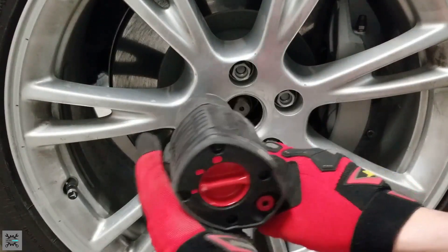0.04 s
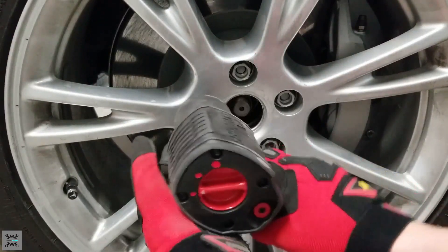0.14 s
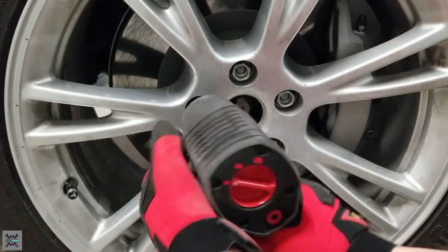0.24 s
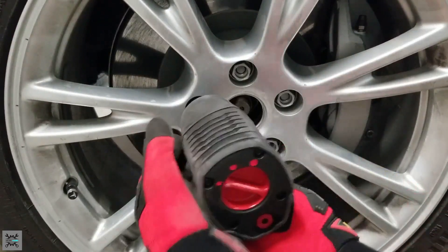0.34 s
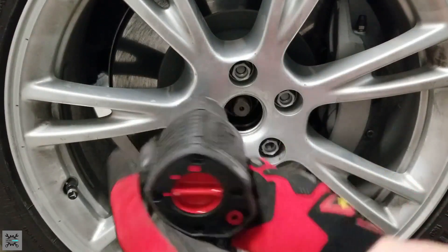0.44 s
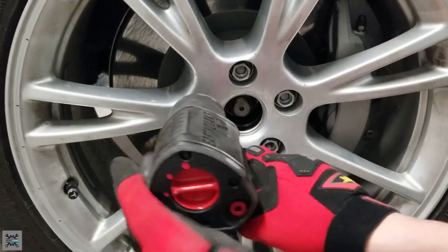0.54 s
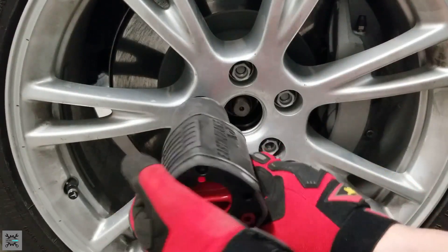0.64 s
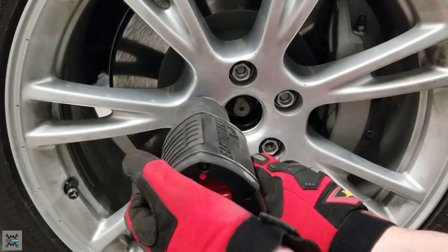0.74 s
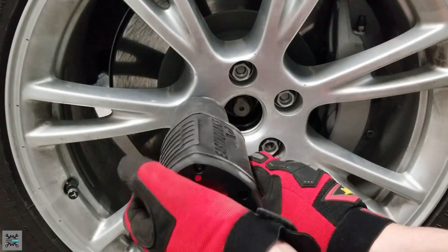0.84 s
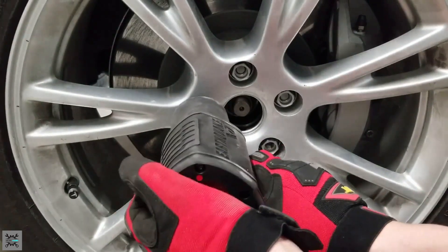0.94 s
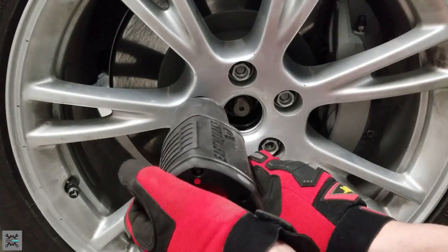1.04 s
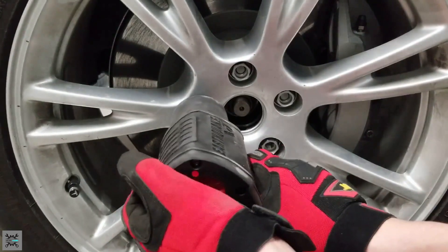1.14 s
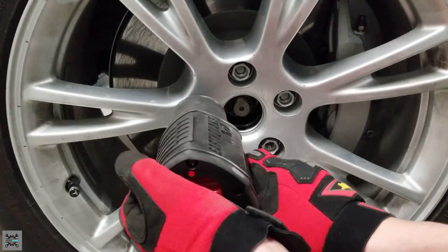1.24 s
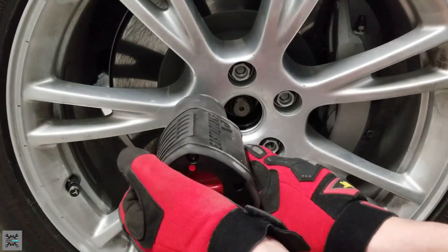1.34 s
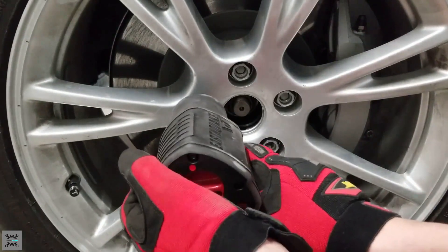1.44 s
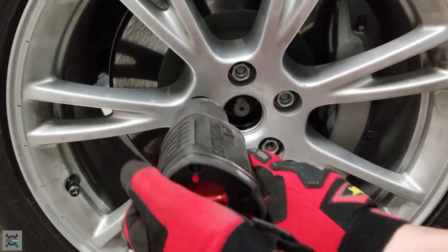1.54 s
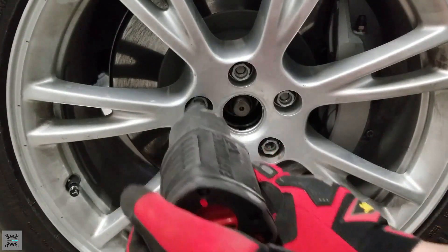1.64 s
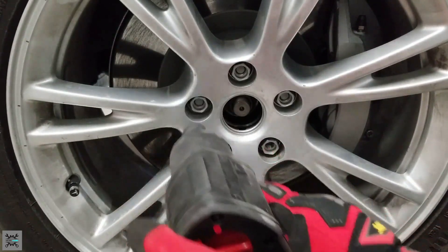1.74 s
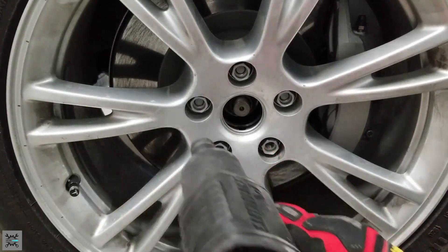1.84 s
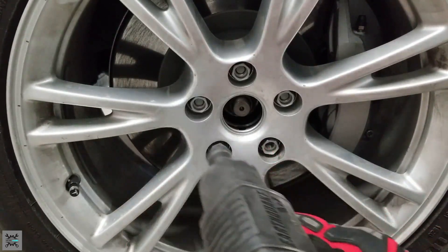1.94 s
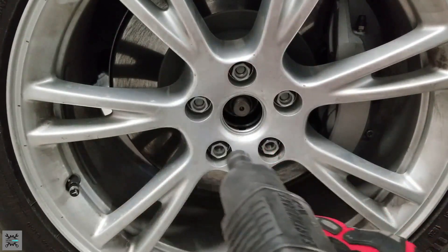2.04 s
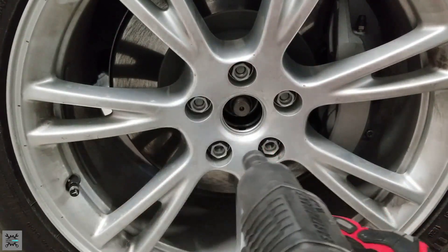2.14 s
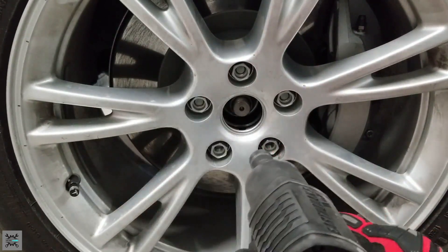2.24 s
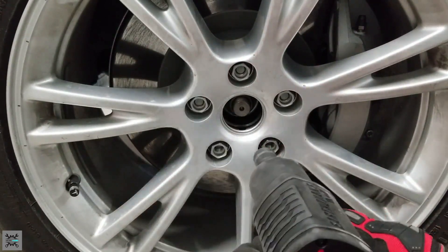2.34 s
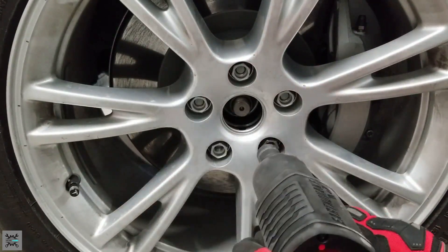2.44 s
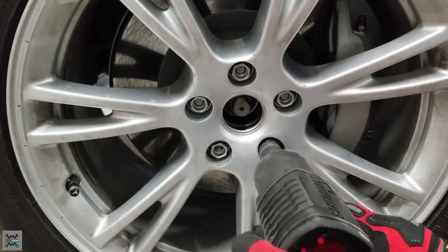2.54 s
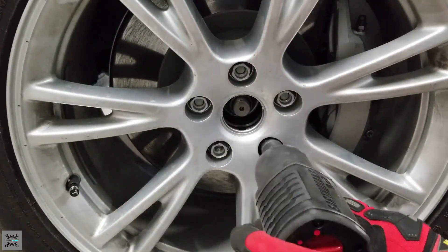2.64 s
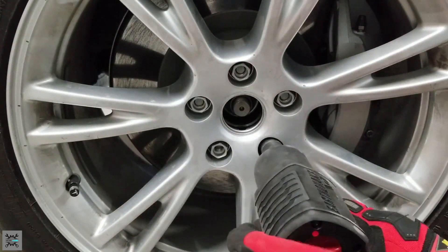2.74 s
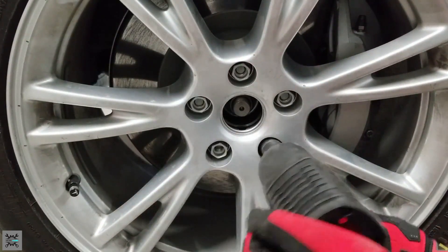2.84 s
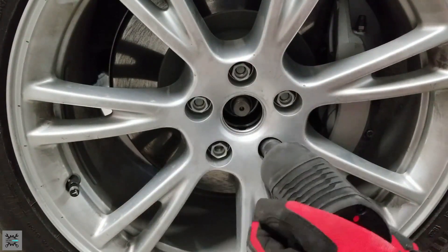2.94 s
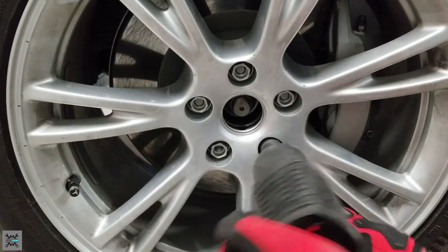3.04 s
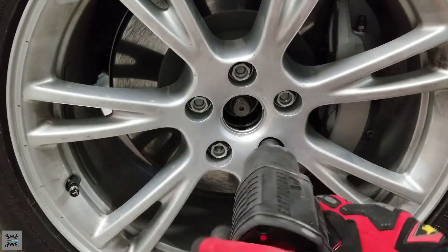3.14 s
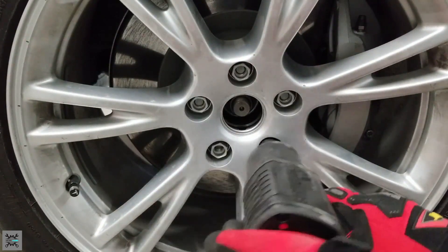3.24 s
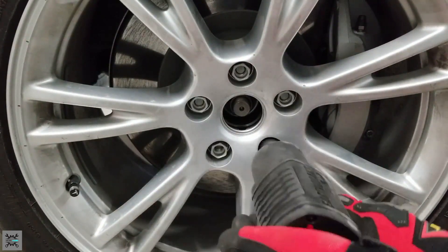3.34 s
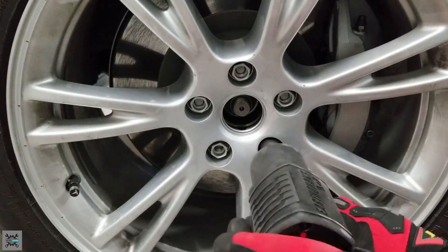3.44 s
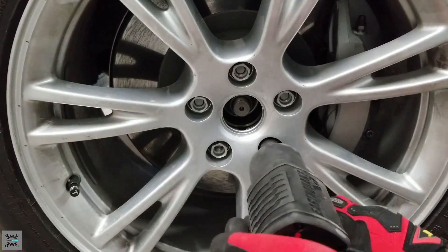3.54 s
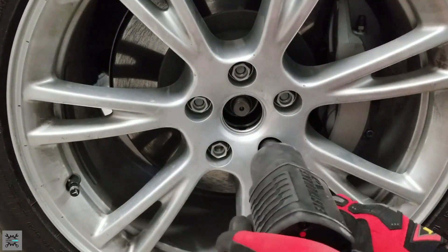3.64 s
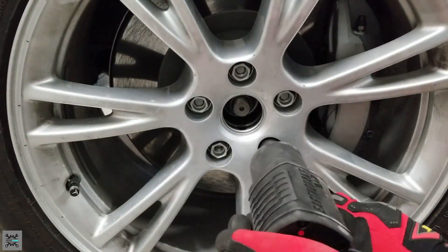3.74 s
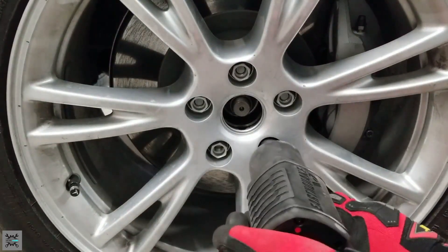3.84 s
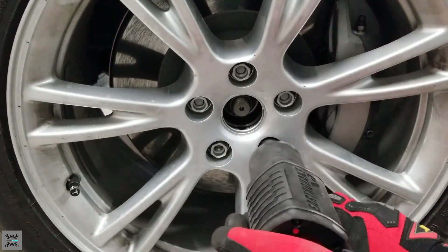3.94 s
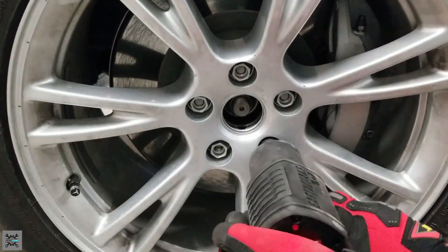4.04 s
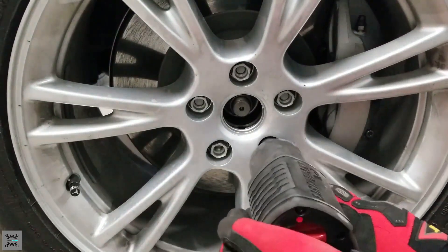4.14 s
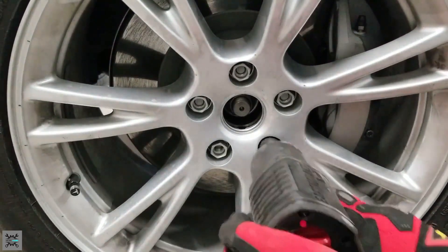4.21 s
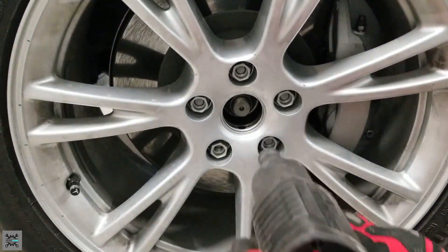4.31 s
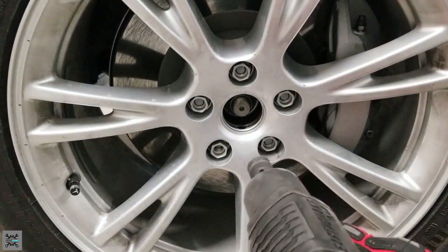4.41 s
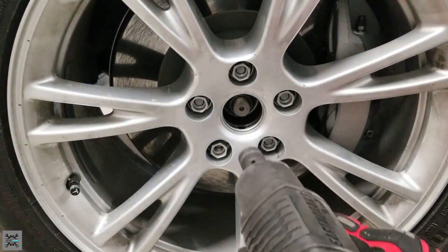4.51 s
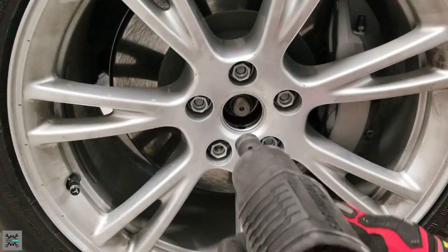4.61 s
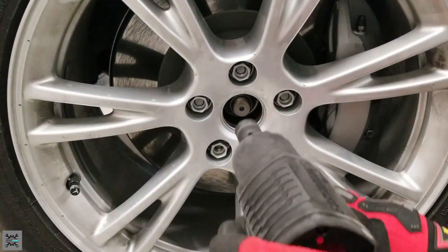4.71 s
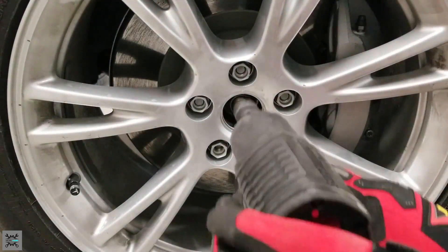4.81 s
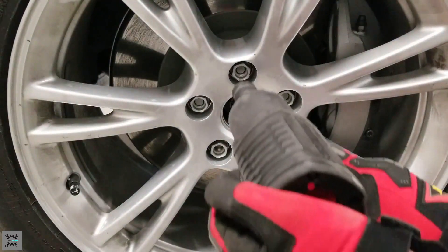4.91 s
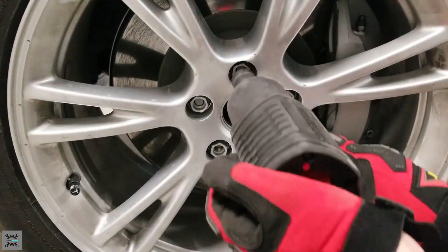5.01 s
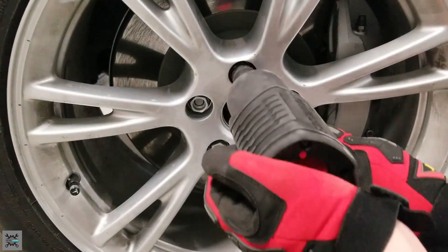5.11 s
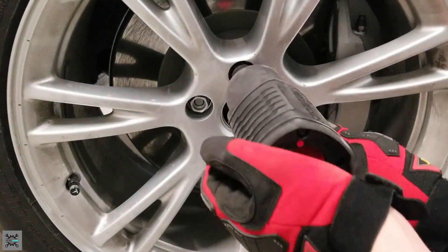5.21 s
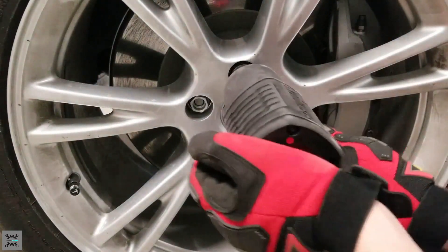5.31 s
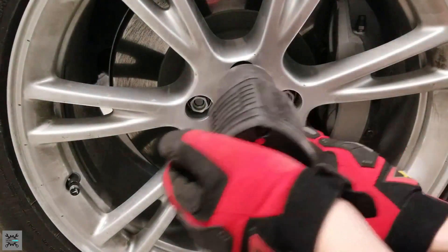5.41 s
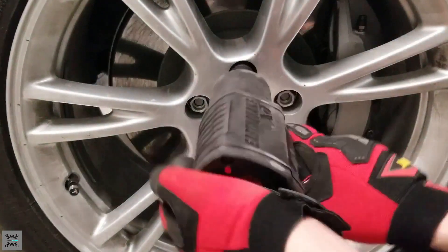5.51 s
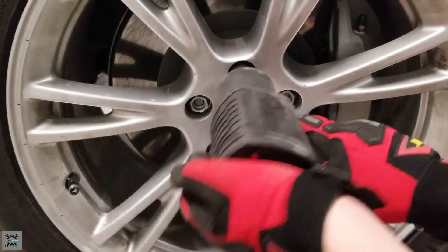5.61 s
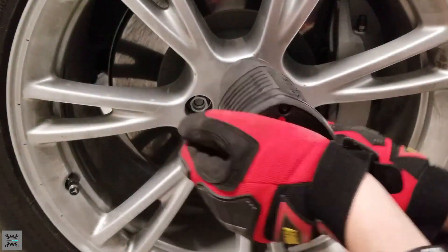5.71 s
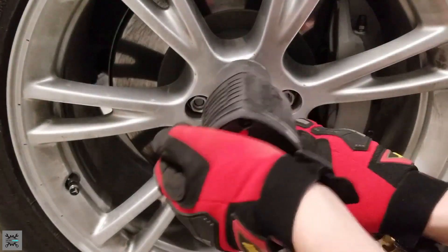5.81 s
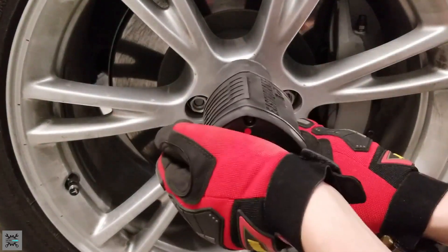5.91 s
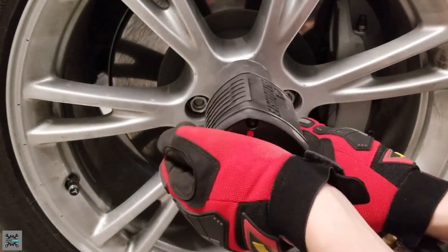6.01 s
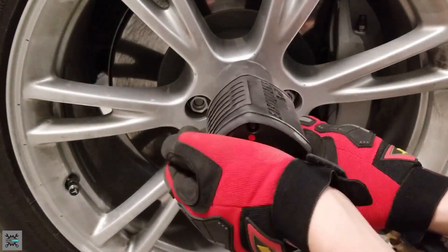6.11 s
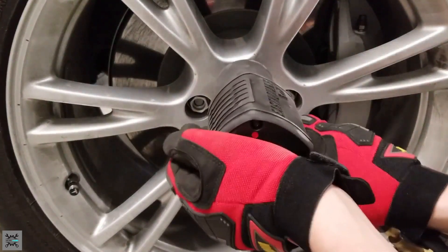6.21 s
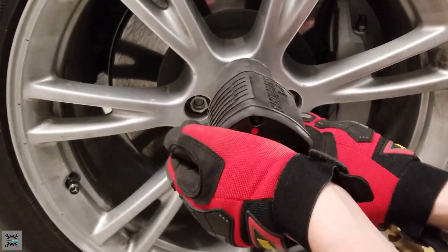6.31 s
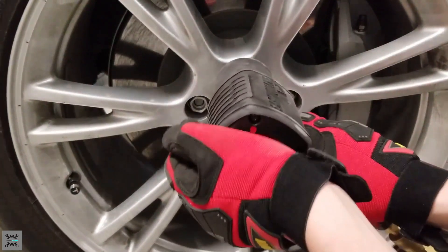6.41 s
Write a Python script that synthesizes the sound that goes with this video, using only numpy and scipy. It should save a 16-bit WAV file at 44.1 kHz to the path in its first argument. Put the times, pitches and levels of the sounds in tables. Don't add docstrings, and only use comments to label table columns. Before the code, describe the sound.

In a garage, a socket scrapes and clacks onto a wheel nut, then a cordless impact wrench whirrs up and hammers for half a second, rattling hard and ringing the alloy wheel. Quiet follows, with faint hum, small steel ticks and soft knocks, before a second similar burst. More light scraping leads to a third, which is still hammering near the end. Close stereo microphone, slightly stronger on the left, little reverberation.

```python
import sys
import numpy as np
from scipy import signal
from scipy.fft import rfft, irfft, next_fast_len
from scipy.io import wavfile
from scipy.ndimage import uniform_filter1d

SR = 44100
rng = np.random.default_rng(int(sys.argv[2]) if len(sys.argv) > 2 else 0)


def attenuation_scalar(level_db):
    decades = np.asarray(level_db, float) / 20
    return 10 ** decades


def waveform_to_disk(signal):
    frames = np.transpose(np.atleast_2d(signal))
    scaled = np.clip(frames, -1, 1) * 32767
    samples = np.round(scaled).astype(np.int16)
    wavfile.write(sys.argv[1], SR, samples)


N = 284886

# (time [s], peak level [dB], extra ring of the wheel [dB])
FIRST_NUT_BLOWS = [(0.8636, -3.5, -3), (0.8703, -1, -6), (0.886, -2.5, -5.5), (0.8955, -3, 0.5),
                   (0.9187, -2.5, -1), (0.9334, -1, 5.5), (0.9511, -3.5, -1.5), (0.9754, -6, 1.5),
                   (1.002, 0, -1.5), (1.0298, -12, 2.5), (1.056, -7, 4), (1.0669, -3.5, 5.5),
                   (1.095, -3, -7.5), (1.106, -3, -2), (1.1311, -6, 6.5), (1.1494, -17.5, 1.5),
                   (1.1769, 1, -1.5), (1.185, -11, 1), (1.2281, 2, 0), (1.2504, -9, -1), (1.2718, -0.5, -3),
                   (1.2842, -11.5, 3.5), (1.3105, 2, -3), (1.322, -13, -7), (1.3553, -2, -2)]
SECOND_NUT_BLOWS = [(3.5139, -14, 1), (3.524, -17, -1.5), (3.5359, 1, -10.5), (3.5517, 3, -6),
                    (3.5629, -8, -2), (3.5854, 1, 1.5), (3.617, 1.5, 2), (3.6428, 2, 2),
                    (3.6644, -10, -2.5), (3.689, -6, 3.5), (3.7112, -5, -3.5), (3.7322, -4.5, -2.5),
                    (3.773, -4, -1), (3.7891, -12, -1), (3.8056, -1.5, 1.5), (3.8404, -2, -1),
                    (3.8528, -8, -3), (3.878, 2, -1.5), (3.8971, -10.5, 4.5), (3.924, 0, -0.5),
                    (3.937, -17, -2), (3.9592, -8, -2), (3.9702, -3.5, -3.5), (3.9991, -4.5, 2),
                    (4.0387, 0.5, -3), (4.084, -5, 0), (4.1643, -6, -7.5)]
THIRD_NUT_BLOWS = [(6.021, -33.5, 10), (6.0284, -30, -3), (6.0417, -5.5, 0), (6.0583, -2.5, 2.5),
                   (6.0689, -2, -0.5), (6.0907, 0.5, 1), (6.1126, -1, 8), (6.1352, -3, -1),
                   (6.1557, -4, 6.5), (6.1768, -8, 9), (6.2029, -11.5, 3.5), (6.221, -10.5, 8),
                   (6.2417, -7, 1), (6.2603, -10, 0), (6.2722, -5.5, 1), (6.2954, -9, 2.5),
                   (6.318, -9.5, -4), (6.3345, -7, -3), (6.3717, -17.5, 3), (6.3988, -1, 1),
                   (6.4243, -18.5, 0.5), (6.4487, -5, -1)]
# (time [s], peak level [dB], weight [dB], hardness [dB])
KNOCKS = [(.016, -31, -19, -15), (0.284, -49.5, 4, -25), (.305, -41.5, 2.5, -45), (.529, -21.5, 3.5, -2),
          (0.77, -56, -5.5, -1.5), (1.577, -30, -25, 3), (1.704, -43.5, -15, 0), (2.464, -34, -24, -23.5),
          (2.508, -43, -13, -35), (2.599, -50.5, -11, -30), (2.648, -32, -8, -2.5), (2.653, -34, -12, -6),
          (2.775, -46, -5, -8), (2.811, -49, -10, -25.5), (2.882, -37, -4, -30), (3.004, -42, -9, -35),
          (3.085, -32.5, -21, 1.5), (3.141, -29, -9, -4), (3.154, -30, -14, -5), (3.27, -30.5, -1, -6),
          (3.277, -41, -2.5, -18), (5.207, -43.5, -5, 2), (5.442, -44, 11.5, -18.5),
          (5.498, -48, -7, -12.5), (5.51, -46, -9, -3), (5.52, -44, -9, -16), (5.54, -45, -9, -10),
          (5.585, -40.5, -4, 2), (5.669, -42.5, 2, -11), (5.764, -37, -1.5, -3), (5.799, -36, -12, -4),
          (5.81, -39, -12, -2), (5.833, -31, -21, -18.5)]
# (time [s], push level [dB], slide level [dB])
HANDLING = [
    [(0, -56, -64), (.132, -60, -82), (.37, -51.5, -80), (.43, -55, -65), (.525, -54, -60), (.57, -40, -57),
     (.686, -44, -55.5), (.734, -50.5, -68.5), (.84, -54, -85)],
    [(2.44, -84, -92), (2.49, -67.5, -76), (2.656, -62.5, -67), (2.732, -63, -74), (2.954, -54, -79),
     (3.128, -53.5, -66), (3.15, -50, -63.5), (3.284, -48, -64), (3.48, -57, -80)],
    [(5.18, -83, -88), (5.206, -73, -81), (5.43, -64, -80), (5.45, -57.5, -70.5), (5.51, -60, -65),
     (5.724, -54, -68.5), (5.77, -40, -60), (5.96, -56, -78), (6.03, -37.5, -79)],
]
# (frequency [Hz], level [dB])
HUM_LINES = [(182, -10), (301, -0.5), (418, -18), (452, -16), (473, -15.5)]
# (frequency [Hz], level [dB per Hz])
AIR_COLOUR = [(24, -57), (40, -29.5), (118, -28.5), (177, -10), (245, -12), (305, -9), (330, -22),
              (520, -29), (900, -43), (1170, -80.5), (1980, -120)]
# (frequency [Hz], level [dB per Hz])
RATTLE_COLOUR = [(24, -56), (45, -58), (110, -33), (382, -11.5), (570, -13.5), (852, -11), (1020, -7),
                 (1180, -13), (1300, -9.5), (2100, -9.5), (3140, -7.5), (4700, -8), (8770, -15),
                 (11300, -11), (16000, -18)]
# (frequency [Hz], level [dB per Hz])
SCRAPE_COLOUR = [(400, -7.5), (1000, 6), (1800, 4), (3000, -3), (7000, -13), (15000, -38)]
# (frequency [Hz], level [dB per Hz])
RUMBLE_COLOUR = [(40, -18), (70, 2.5), (115, 1), (250, -4), (500, -10.5), (900, -42)]
# (frequency [Hz], t60 [s], level at first, second and third nut [dB])
WHEEL_MODES = [(332, .03, 1.5, -4, -4), (471, 1, -29, -29, -28), (676, 0.4, -17, -13.5, -20),
               (931, 0.44, -16, -14, -15.5), (1015, 0.13, -2, 1.5, -6), (1031, 0.063, -9, -10, -17),
               (1077, 0.39, -15.5, -13.5, -18), (1258, 0.073, -9.5, -4.5, -7), (1338.5, 0.1, -8.5, -7, -.5),
               (1423, 0.067, -12.5, -9.5, -5.5), (1671, 0.09, -9, -8, -.5), (1756, 0.11, -12, -12, -1),
               (1958, 0.12, -4.5, -9, -8.5), (2442, 0.18, -11.5, -8, -7.5), (2640, .16, -12.5, -8.5, -10.5),
               (2810, .12, -6.5, -10, -11), (3090, 0.1, -7, -9, -6), (3250, .09, -14, -14.5, -13),
               (3850, 0.081, -11, -15, -14), (4710, 0.12, -14, -14.5, -17), (5270, 0.1, -9.5, -11.5, -12),
               (6500, 0.24, -24, -23.5, -24), (8485, 0.36, -28, -30.5, -28.5),
               (10650, 0.035, -7.5, -8, -10.5)]
# (frequency [Hz], t60 [s])
BLOW_T60 = [(60, 0.19), (300, 0.21), (1500, 0.115), (5000, 0.125), (15000, 0.08)]
# (frequency [Hz], t60 [s])
GARAGE_T60 = [(60, 0.88), (300, 0.72), (1000, 0.76), (2000, 0.77), (5000, 0.57), (9000, 0.29),
              (13000, 0.52)]
# (frequency [Hz], left-right likeness [0 to 1])
LIKENESS = [(60, 0.95), (250, 0.99), (600, 0.74), (1200, .45), (2500, 0.012), (8000, 0.014)]
# (frequency [Hz], left minus right [dB])
LEFT_LEAN = [(60, -1), (150, 2.5), (380, -0.5), (950, 6.5), (2380, 2.5), (5980, 5.5), (15000, 3)]
# (frequency [Hz], level [dB per Hz])
RUSTLE_COLOUR = [(5000, -30), (9000, -10), (14000, 0.5)]
NEXT_NUT_S = [
    2.3,
    5.95,
]
# (time [s], level reached [dB], time per 60 dB of rise [s])
SWELLS = [
    (.525, -50, 0.3),
    (.864, -22, 0.06),
    (3.513, -34, 0.035),
    (6.042, -23, 0.025),
]
# (time [s], level [dB])
TICKS = [
    (0.53, -36),
    (.769, -53.5),
    (1.577, -58),
    (1.705, -64),
    (3.086, -59),
    (3.143, -47.5),
    (5.21, -58),
    (5.441, -63),
    (5.5, -64),
    (5.586, -60),
]
# (time [s], length [s], level [dB])
SQUEAKS = [
    (2.57, 0.111, -68),
    (3.098, 0.072, -69.5),
]
# (squeezed [s], let go [s], motor level [dB], gear rattle level [dB], rattle fade [dB per s])
PULLS = [
    (0.853, 1.33, -31.5, -17, 58),
    (3.523, 4.05, -27.5, -16, 64.5),
    (6.029, 6.5, -26, -16, 41),
]
# (time [s], from speed [Hz], towards speed [Hz], sag under load [Hz per s])
SPINS = [
    (.85, 140.6, 180, 10),
    (0.946, 119.6, 210, 29.1),
    (1.199, 150.4, 195, 10),
    (3.55, 128, 305.4, 225),
    (6.045, 121.6, 292, 173),
]
# (time [s], peak level [dB])
BOUNCES = [(0.9377, -8.5), (.968, -10), (1.0052, -6), (1.0125, -7.5), (1.139, -9), (1.154, -8.5),
           (1.1975, -8), (1.2067, -14), (1.2782, -5), (1.29, -9.5), (1.3164, -5), (1.325, -7), (1.331, -14),
           (1.367, -14), (3.5649, -5), (3.5779, -11), (3.5925, -6), (3.6046, -6.5), (3.6474, -2),
           (3.674, -8.5), (3.7165, -5), (3.7423, -9.5), (3.7522, -5), (3.759, -8.5), (3.78, -8),
           (3.8227, -4.5), (3.8549, -4.5), (3.905, -16.5), (3.9283, -6), (3.974, -10.5), (4.0076, -12.5),
           (4.0137, -8.5), (4.0628, -14.5), (6.121, -2), (6.1631, -8), (6.192, -12), (6.1986, -11),
           (6.231, -8.5), (6.342, -7), (6.401, -14), (6.4552, -13.5)]
# (time [s], frequency [Hz], level [dB], t60 [s])
KNOCK_RINGS = [(.017, 1077, -43.5, 0.16), (0.018, 1330, -57, 0.098), (.017, 4770, -50.5, .06),
               (0.5309, 300.8, -13, 0.059), (.545, 112.2, -32, 0.99), (0.544, 245, -38.5, .3),
               (2.464, 1270, -37, 0.051), (2.464, 1077, -45, 0.23), (2.465, 1479, -52, .2),
               (2.464, 2591, -63, 0.4), (2.464, 3183, -54, 0.06), (2.508, 1323, -49, .2),
               (2.464, 420, -53, .12), (2.647, 400, -48, .1), (2.647, 1030, -46.5, 0.15),
               (2.646, 1077, -46.5, 0.2), (2.646, 1670, -49, 0.22), (2.647, 2800, -40, 0.096),
               (2.648, 3090, -46, 0.091), (2.647, 4750, -38, 0.055), (2.81, 1198, -50.5, 0.087),
               (2.882, 1800, -49, 0.1), (3.004, 1050, -48.5, 0.16), (3.146, 301, -36, .06),
               (3.15, 104.7, -30.5, .09), (3.148, 2826, -47, .06), (3.266, 301.7, -33.5, .06),
               (3.269, 109.2, -33.5, 0.35), (3.27, 77.4, -34.5, 0.37), (3.27, 1023, -41.5, .12),
               (5.21, 1960, -60, 0.21), (5.209, 5030, -56, 0.03), (5.21, 402.1, -48, 0.043),
               (5.444, 400, -41, .05), (5.455, 1017, -55, .3), (5.81, 1800, -55, .2), (5.8, 115, -39, .3),
               (5.485, 502, -44.5, 0.076), (5.508, 498.7, -40.5, 0.051), (5.588, 448, -37, 0.044),
               (5.761, 220, -37, .08), (5.762, 110, -40.5, .3), (5.87, 115, -41, 0.27),
               (5.66, 1017, -56, .4), (5.797, 304, -39, .06), (5.834, 1268, -45, 0.09),
               (5.801, 1720, -59, 0.16)]
# (frequency [Hz], width [Hz], level [dB])
AIR_BANDS = [(4470, 400, -14), (6400, 430, -20), (8300, 150, -25), (13000, 2500, -22)]
# (time [s], frequency [Hz], level [dB], t60 [s])
SINGING_BLOWS = [(1.152, 1017, -17, .1), (1.29, 1017, -20, .1), (3.775, 1017, -17, .15),
                 (3.94, 112, -33, .5), (3.545, 100, -27, .12), (3.8, 676, -24.5, .3), (3.925, 992, -19, .1),
                 (.934, 1077, -19, .15), (.95, 260, -18, .1), (.95, 390, -20, .12), (1.064, 1019, -13, .09),
                 (1.028, 1017, -17, .12), (1.177, 1958, -21, .15), (3.553, 450, -21, .08),
                 (3.594, 1017, -12, .11), (3.643, 1017, -17, .15), (3.643, 931, -21, .2),
                 (3.69, 1016, -16, .1), (6.21, 1017, -20, .15), (6.272, 480, -22, .08),
                 (6.225, 1330, -19, .1)]
# (time [s], level [dB])
THUMPS = [(.871, -12), (.909, -9), (.954, -8), (.991, -14), (1.039, -14), (1.075, -16), (3.551, -11),
          (3.568, -10), (3.609, -15), (6.007, -33), (6.031, -27), (6.052, -5.5), (6.063, -14), (6.078, -12),
          (6.101, -14), (6.279, -15), (6.402, -10)]
# (time [s], frequency [Hz], level [dB])
CLANGS = [(.893, 4950, -14), (.932, 2985, -18), (1.004, 2980, -14), (1.03, 5200, -17), (1.067, 2505, -17),
          (1.132, 2830, -17), (1.184, 4560, -14), (1.196, 2916, -18), (1.231, 2975, -16),
          (1.277, 4660, -16), (3.506, 2350, -38), (3.551, 2700, -16), (3.563, 4900, -12),
          (3.584, 3050, -15), (3.622, 2400, -17), (3.645, 4720, -12), (3.665, 5040, -14),
          (3.751, 3050, -16), (3.817, 2470, -15), (3.854, 4940, -14), (3.877, 4580, -12),
          (3.959, 3150, -17), (4.039, 4570, -15), (4.164, 4700, -24), (6.04, 2650, -19), (6.059, 1715, -16),
          (6.115, 1700, -14), (6.137, 3090, -17), (6.165, 1695, -16), (6.191, 1690, -14),
          (6.273, 2390, -17), (6.399, 3095, -14), (6.399, 3800, -16)]

EDGES_HZ = 40 * 2 ** np.arange(0, 8.8, .5)
SIDES = np.array([[1], [-1]])

LOOSE_BOOM_DB, SNUG_BOOM_DB, LOOSE_EDGE_DB, SNUG_S = 11, -2.5, -0.6, 0.11
LIGHT_EDGE, BLOW_SCATTER_DB = 0.34, 2.5
CRACK_T60_S, CRACK_DB, BOUNCE_T60_S, BOUNCE_DB = 0.021, -1.5, .04, -2
KNOCK_EDGE_DB, EDGE_FOLLOWS, KNOCK_T60_SHARE = -31.5, .55, 0.67
TICK_T60_S, EDGE_CUT_HZ = 0.033, 2500
RUSTLE_DB, RUSTLE_FOLLOWS = -89, .9
STRIKE_SCATTER_DB = 2
RING_ROUGH_DB, THUMP_HZ, THUMP_T60_S, CLANG_T60_S = 5.5, 335, .045, .065
IN_STEP_BELOW_HZ = 2100
GEARS_BITE_S, GEARS_RISE_DB_PER_S = .185, 400
HOUSING_HZ, HOUSING_OCTAVES, HOUSING_DB, SECOND_ORDER_DB = 353, .3, 12.5, -4
SPIN_UP_S, MOTOR_RISE_S, MOTOR_STOP_S = .092, 0.044, .06
MOTOR_TIRES_DB_PER_S, WHIRR_DB = 28, 11
SQUEAK_HZ, SQUEAK_WIDTH_HZ = 14200, 1100
GATE_OPEN_DB, GATE_SHUT_DB, GATE_KNEE_DB, GATE_SLOPE, GATE_SINK_DB_PER_S = -56.5, -68, -41, 0.41, 18
HISS_DB, DEEP_AIR_DB, AIR_BANDS_SINK = -81.5, -82.5, 1.6
TOP_HZ = 15980


def contacts():
    blow_s, blow_db, body = np.transpose(FIRST_NUT_BLOWS + SECOND_NUT_BLOWS + THIRD_NUT_BLOWS)
    pulled = np.array(PULLS)[np.searchsorted(NEXT_NUT_S, blow_s), 0]
    loose = np.exp(-(blow_s - pulled) / SNUG_S)
    chance = BLOW_SCATTER_DB * rng.standard_normal((len(blow_s), 2))
    boom = SNUG_BOOM_DB + LOOSE_BOOM_DB * loose + chance[:, 0]
    edge = LOOSE_EDGE_DB * loose - LIGHT_EDGE * (blow_db - np.mean(blow_db)) + chance[:, 1]
    knock_s, knock_db, thud, bright = np.transpose(KNOCKS)
    knock_edge = KNOCK_EDGE_DB + EDGE_FOLLOWS * bright

    ticks = dying(clicks(*np.transpose(TICKS)), TICK_T60_S)
    bounces = attenuation_scalar(BOUNCE_DB) * dying(clicks(*np.transpose(BOUNCES)), BOUNCE_T60_S)
    spin_up = sum(dying(clicks([N / SR - s], [db]), rise_s)[::-1] for s, db, rise_s in SWELLS)
    _, whirr_db, gears_db = motor_state()
    whirr = attenuation_scalar(whirr_db) * attenuation_scalar(WHIRR_DB)
    gears = attenuation_scalar(gears_db)
    slide_db = in_time(HANDLING, 2, -200)
    scrape, rumble = attenuation_scalar(slide_db), attenuation_scalar(in_time(HANDLING, 1, -200))
    rustle = attenuation_scalar(RUSTLE_DB + RUSTLE_FOLLOWS * (slide_db + 64.5))

    chatter = attenuation_scalar(2.4 * drift(900) + 0.46 * drift(120))
    hush = dying(clicks(N / SR - blow_s + 0.00038, blow_db - np.max(blow_db)), 0.026)[::-1]
    chatter = chatter * attenuation_scalar(-9.0 * np.minimum(hush, 1))
    patches = attenuation_scalar(2.3 * drift(90))

    def blow_at(hz):
        shares = [0.33 * boom, boom, body, 0 * boom, edge - .2]
        return blow_db + share_at(hz, [130, 350, 1400, 4000, 11000], shares) - 11.0 * octaves_below(200, hz)

    def knock_at(hz):
        shares = [thud + 6, 0.3 * thud - 12, 0 * thud, bright - 4, knock_edge - 5.5]
        return knock_db + share_at(hz, [300, 650, 1400, 4500, 11000], shares) - 33.0 * octaves_below(200, hz)

    def envelope(hz):
        t60, colour = at_hz(BLOW_T60, hz), at_hz(RATTLE_COLOUR, hz)
        blows = clicks(blow_s, blow_at(hz) + colour - 5.5 + 2.0 * rng.standard_normal(len(blow_s)))
        sharp = attenuation_scalar(-8.0 * octaves_below(EDGE_CUT_HZ, hz))
        cracks = attenuation_scalar(CRACK_DB) * dying(blows, CRACK_T60_S)
        hits = dying(blows, t60) + sharp * (cracks + bounces * attenuation_scalar(colour))
        hits = hits + dying(clicks(knock_s, knock_at(hz) - 1.5), KNOCK_T60_SHARE * t60)
        hits = hits + ticks * attenuation_scalar(3.5 - 8.3 * octaves_below(EDGE_CUT_HZ, hz))
        steady = gears * attenuation_scalar(colour + 6.5 - 9.0 * octaves_below(250, hz))
        steady = steady + scrape * attenuation_scalar(at_hz(SCRAPE_COLOUR, hz) + 7)
        steady = steady + rustle * attenuation_scalar(at_hz(RUSTLE_COLOUR, hz) - 2.5)
        touching = (hits + steady) * chatter * np.roll(patches, rng.integers(N))
        smooth = (spin_up * attenuation_scalar(7.5) + whirr * sharp) * attenuation_scalar(colour)
        return touching + smooth + rumble * attenuation_scalar(at_hz(RUMBLE_COLOUR, hz) + 16.0)

    def strikes(hz):
        blow_scatter = STRIKE_SCATTER_DB * rng.standard_normal(len(blow_s))
        knock_scatter = STRIKE_SCATTER_DB * rng.standard_normal(len(knock_s))
        blows = clicks(blow_s, blow_at(hz) - 44.5 + blow_scatter)
        return blows + clicks(knock_s, knock_at(hz) - 36 - 3.0 * octaves_below(hz, 2000) + knock_scatter)

    shaking = gears * attenuation_scalar(-40.5) + scrape * attenuation_scalar(-30.5)
    return through_bands(envelope) + wheel(strikes, shaking)


def wheel(strikes, shaking):
    out, white = np.zeros((2, N)), rng.standard_normal(N)
    uneven = attenuation_scalar(3.0 * drift(25))
    nut = np.searchsorted(NEXT_NUT_S, np.arange(N) / SR)
    for hz, t60, *levels_db in WHEEL_MODES:
        r, w = attenuation_scalar(-60 / (t60 * SR)), 2 * np.pi * hz / SR
        hits = strikes(hz)
        rattle = (dying(hits, 0.055) + shaking * np.roll(uneven, rng.integers(N))) * white
        drive = (attenuation_scalar(15.0) * hits + rattle) * attenuation_scalar(levels_db)[nut]
        tone = signal.lfilter([0, np.sin(w)], [1, -2 * r * np.cos(w), r * r], drive)
        in_step = hz < IN_STEP_BELOW_HZ or rng.random() < .5
        out += tone * left_lean(hz) * [[1], [1 if in_step else -1]]
    return signal.sosfilt(signal.butter(1, 75, "high", fs=SR, output="sos"), out)


def rings():
    out, rough = np.zeros((2, N)), RING_ROUGH_DB * np.minimum(drift(160), .6)
    thumps = [(s, THUMP_HZ, db, THUMP_T60_S) for s, db in THUMPS]
    clangs = [(s, hz, db, CLANG_T60_S) for s, hz, db in CLANGS]
    for s, hz, db, t60 in KNOCK_RINGS + SINGING_BLOWS + thumps + clangs:
        start = int(s * SR)
        t = np.arange(min(int(1.2 * t60 * SR), N - start)) / SR
        flutter = np.resize(rough[rng.integers(N // 2):], len(t)) * min(hz / 1000, 1)
        onset = np.minimum(t * hz / 1.3, 1)
        tone = attenuation_scalar(db - 60 * t / t60 + flutter) * np.sin(2 * np.pi * hz * t) * onset
        out[:, start:start + len(t)] += tone * left_lean(hz)
    return out


def motor():
    wobble, throb = .012 * drift(40), attenuation_scalar(2 * drift(30))
    speed, level_db, _ = motor_state()
    turn = 2 * np.pi * np.cumsum(speed * (1 + wobble)) / SR
    boom_db = HOUSING_DB * np.exp(-(np.log2(2 * speed / HOUSING_HZ) / HOUSING_OCTAVES) ** 2)
    first = attenuation_scalar(level_db + 3.0)
    second = attenuation_scalar(level_db + SECOND_ORDER_DB + boom_db + 4.0 * drift(35))
    other_orders = np.sin(turn) + attenuation_scalar(-1) * np.sin(3 * turn) + attenuation_scalar(-7.5) * np.sin(4 * turn)
    tone = first * other_orders + second * np.sin(2 * turn)
    return uniform_filter1d(tone * throb, size=9)


def motor_state():
    t = np.arange(N) / SR
    speed, level, gears = np.full(N, 150.), np.full(N, -200.), np.full(N, -200.)
    for s, from_hz, towards_hz, sag in SPINS:
        since = np.clip(t - s, 0, .7)
        spun = towards_hz - (towards_hz - from_hz) * np.exp(-since / SPIN_UP_S) - sag * since
        speed = np.where(t > s - .03, spun, speed)
    for s, end, db, gear_db, fade in PULLS:
        stopping = 30 * np.maximum(t - end, 0) / MOTOR_STOP_S
        rising = 30 * (t - s - MOTOR_RISE_S) / MOTOR_RISE_S
        held = np.minimum(rising, -MOTOR_TIRES_DB_PER_S * (t - s)) - stopping
        level = np.maximum(level, db + held)
        bitten = t - s - GEARS_BITE_S
        rattling = np.minimum(GEARS_RISE_DB_PER_S * bitten, -fade * bitten) - stopping
        gears = np.maximum(gears, gear_db + rattling)
    return speed, level, gears


def squeaks():
    t = np.arange(N) / SR
    edges = [SQUEAK_HZ - SQUEAK_WIDTH_HZ / 2, SQUEAK_HZ + SQUEAK_WIDTH_HZ / 2]
    shape = sum(attenuation_scalar(db + 14) * np.sin(np.pi * np.clip((t - s) / length, 0, 1)) for s, length, db in SQUEAKS)
    sos = signal.butter(2, edges, "band", fs=SR, output="sos")
    return signal.sosfilt(sos, rng.standard_normal((2, N))) * shape


def garage(x):
    t = np.arange(30000) / SR
    tail = through_bands(lambda hz: attenuation_scalar(-60 * t / at_hz(GARAGE_T60, hz)) * (t > .012), size=len(t))
    size = next_fast_len(N + len(t))
    return irfft(rfft(x.mean(axis=0), size) * rfft(tail, size), size)[:, :N]


def hum(gate):
    t = np.arange(N) / SR
    lines = 0
    for hz, db in HUM_LINES:
        swell, slip = 1.2 * drift(10), .15 * drift(8)
        lines = lines + attenuation_scalar(db + swell) * np.sin(2 * np.pi * hz * t + slip)
    air = through_bands(lambda hz: attenuation_scalar(at_hz(AIR_COLOUR, hz) + 21.0), count=10)
    thin = sum(attenuation_scalar(db + 2.7 * drift(16)) * band(hz, width_hz) for hz, width_hz, db in AIR_BANDS)
    air = air + (gate / attenuation_scalar(GATE_OPEN_DB)) ** AIR_BANDS_SINK * thin
    hiss = attenuation_scalar(HISS_DB - 4) * band(5600, 9600) + attenuation_scalar(DEEP_AIR_DB) * band(60, 90)
    return gate * (lines * attenuation_scalar(.6 * SIDES) + air) + hiss


def gate_gain(sound):
    power = uniform_filter1d(np.mean(sound ** 2, axis=0), size=2000)
    level = 10 * np.log10(np.maximum(power, 1e-12))
    sink = GATE_SINK_DB_PER_S * np.arange(N) / SR
    wanted = GATE_OPEN_DB + GATE_SLOPE * np.minimum(level - GATE_KNEE_DB, 0)
    held = np.maximum.accumulate(wanted + sink) - sink
    return attenuation_scalar(uniform_filter1d(np.maximum(held, GATE_SHUT_DB), size=2000))


def through_bands(envelope, size=N, count=17):
    out, white = 0, rng.standard_normal((2, 2, size))
    for k, (low, high) in enumerate(zip(EDGES_HZ[:count], EDGES_HZ[1:])):
        hz = np.sqrt(low * high)
        sos = signal.butter(2, [low, high], "band", fs=SR, output="sos")
        sos = np.vstack([sos, signal.butter(2, low / 2, "high", fs=SR, output="sos")])
        mid, side = signal.sosfilt(sos, white[k % 2] * envelope(hz))
        alike = np.clip(at_hz(LIKENESS, hz), 0, 1)
        pair = np.sqrt(1 + alike) * mid + np.sqrt(1 - alike) * side * SIDES
        out = out + pair * left_lean(hz)
    return out


def band(hz, width_hz):
    sos = signal.butter(2, [hz - width_hz / 2, hz + width_hz / 2], "band", fs=SR, output="sos")
    return signal.sosfilt(sos, rng.standard_normal((2, N))) * np.sqrt(SR / 2 / width_hz)


def clicks(times, db):
    out = np.full(N, 1e-18)
    np.add.at(out, (np.asarray(times) * SR).astype(int), attenuation_scalar(db))
    return out


def dying(train, t60):
    return signal.lfilter([1], [1, -attenuation_scalar(-60 / (t60 * SR))], train)


def drift(rate):
    step = max(int(SR / rate / 2), 1)
    return np.interp(np.arange(N) / step, np.arange(N // step + 2), rng.standard_normal(N // step + 2))


def at_hz(points, hz):
    table_hz, values = np.transpose(points)
    return np.interp(np.log(hz), np.log(table_hz), values)


def share_at(hz, centres_hz, shares):
    return np.array([np.interp(np.log(hz), np.log(centres_hz), row) for row in np.transpose(shares)])


def octaves_below(corner_hz, hz):
    return max(np.log2(corner_hz / hz), 0)


def left_lean(hz):
    return attenuation_scalar(at_hz(LEFT_LEAN, hz) / 2 * SIDES)


def in_time(tables, column, outside):
    out = np.full(N, outside, float)
    for rows in tables:
        rows = np.array(rows)
        at = np.arange(int(rows[0, 0] * SR), min(N, int(rows[-1, 0] * SR)))
        out[at] = np.interp(at / SR, rows[:, 0], rows[:, column])
    return out


def scene():
    near = contacts() + motor() * attenuation_scalar(.5 * SIDES) + squeaks() + rings()
    room = near + attenuation_scalar(-45.5) * garage(near)
    left, right = room + hum(gate_gain(room))
    return np.array([left, np.pad(right, (3, 0))[:N]])


def band_limit(x):
    return signal.sosfilt(signal.butter(12, 16440, fs=SR, output="sos"), x)


def record(dry):
    rounded = 1.086 * np.tanh(dry / 1.113)
    lean = signal.sosfilt(signal.butter(2, 62, "high", fs=SR, output="sos"), rounded)
    mix = signal.sosfilt(signal.ellip(8, .5, 50, TOP_HZ, fs=SR, output="sos"), lean)
    return band_limit(mix)


dry = scene()
out = record(dry)
waveform_to_disk(out)
```